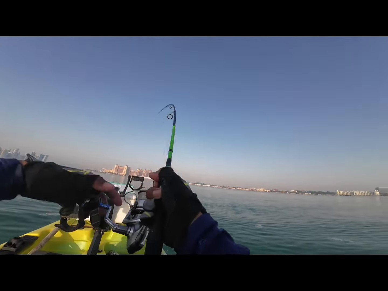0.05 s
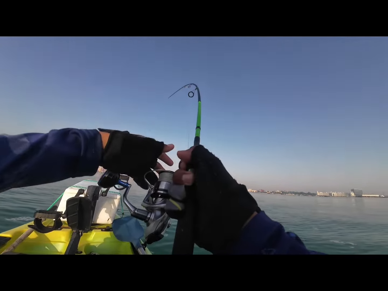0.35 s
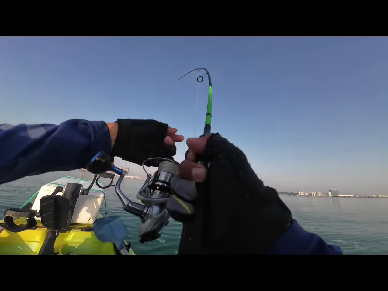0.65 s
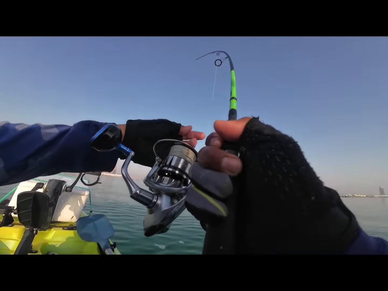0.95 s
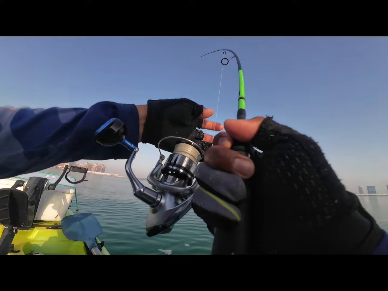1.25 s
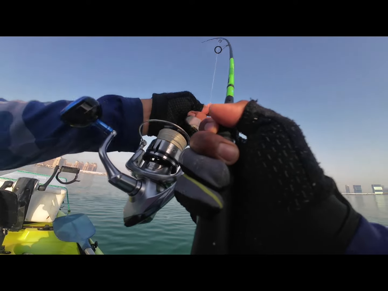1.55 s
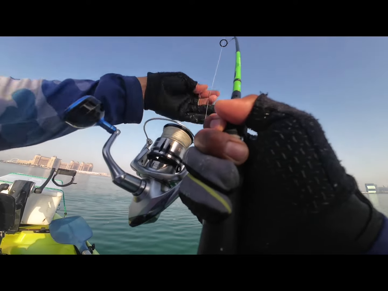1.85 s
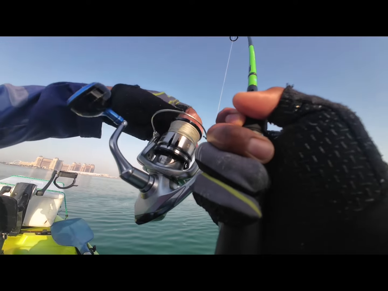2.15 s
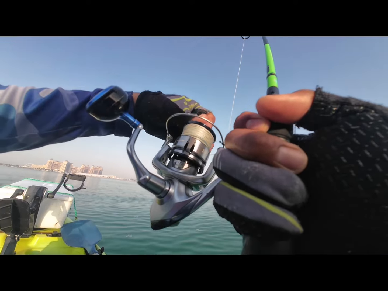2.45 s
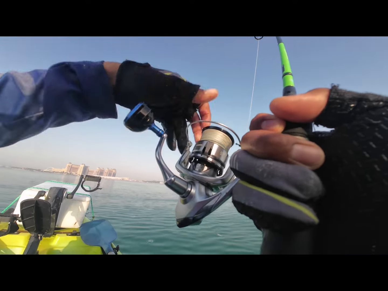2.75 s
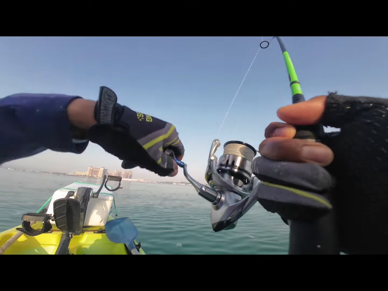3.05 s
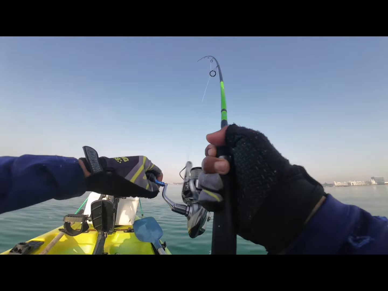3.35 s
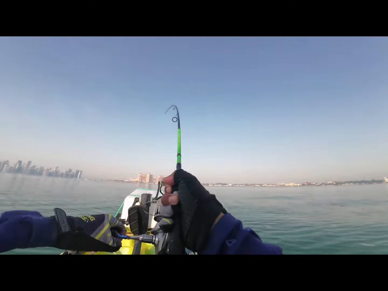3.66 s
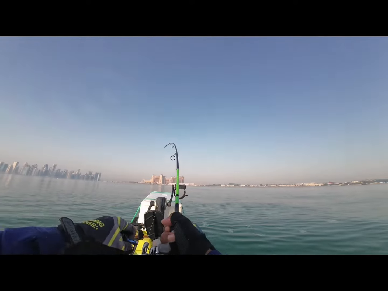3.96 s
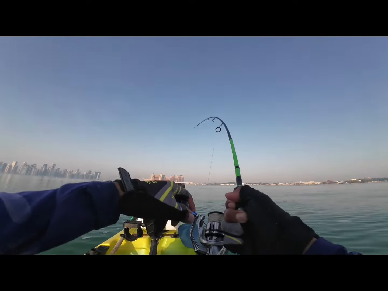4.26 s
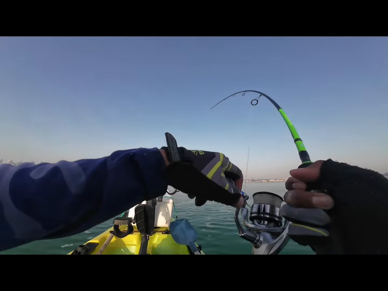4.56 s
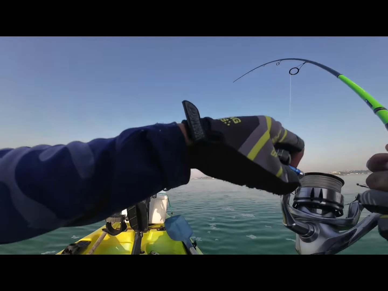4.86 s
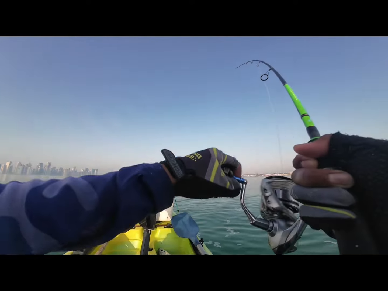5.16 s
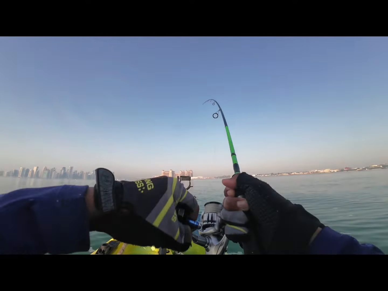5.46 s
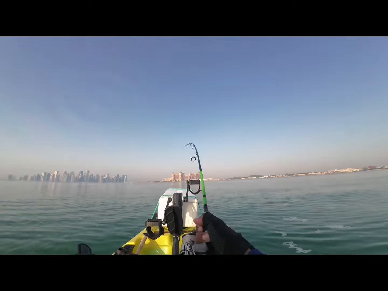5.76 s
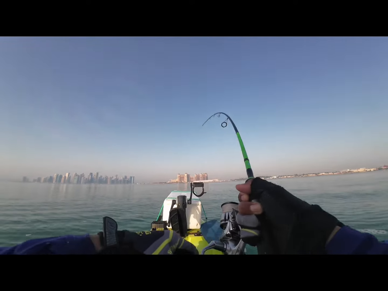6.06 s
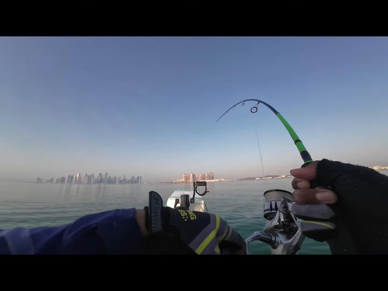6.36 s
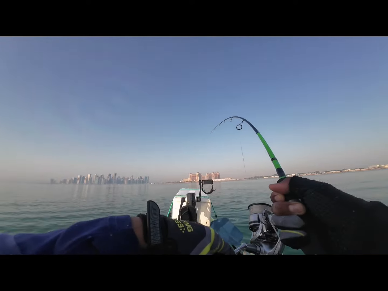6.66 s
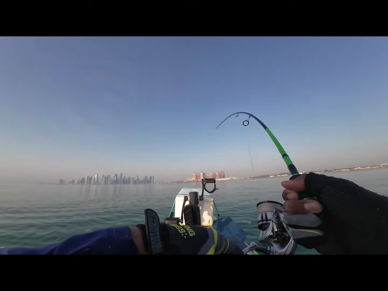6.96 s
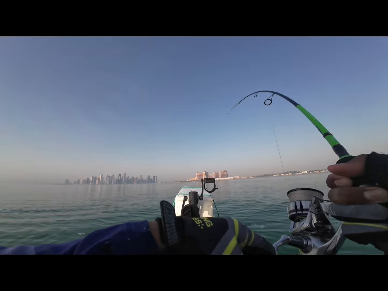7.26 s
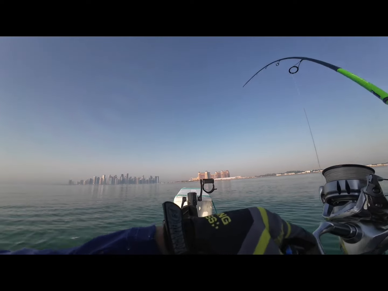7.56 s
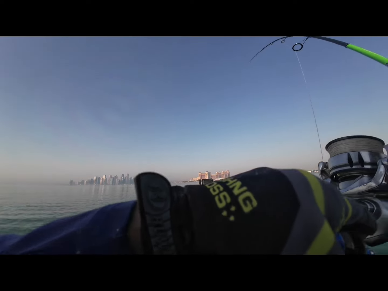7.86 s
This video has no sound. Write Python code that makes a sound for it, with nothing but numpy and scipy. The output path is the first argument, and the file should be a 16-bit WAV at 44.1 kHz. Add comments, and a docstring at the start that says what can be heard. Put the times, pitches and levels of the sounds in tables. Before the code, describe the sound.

A faint, low murmur of breeze and calm water runs throughout, with a thin hiss on top. At about 1.8 seconds a spinning reel's drag gives a short, bright metallic rasp as a fish takes line, followed by a couple of light knocks. Around 2.6 seconds the drag knob makes six quick, crisp clicks, and a sharp clack lands near 3 seconds. From 3.2 to 4.1 seconds the handle is wound: gears whirr with a wavering whine, line swishes softly, and loose parts knock, loudest around 4 seconds. After a lull, a second, shorter spell of winding runs from 5.3 to 5.9 seconds. A few soft, dull bumps from hands on the rod and wavelets on the kayak hull come with the handling. At about 6.8 seconds the drag rasps again, briefer and quieter. Everything sounds close and dry.

```python
"""A spinning reel's drag ratchet rasps twice as a fish takes line, each tooth snapping a pawl on the spool.
Between the runs the angler clicks the drag knob tighter, grabs the handle and winds in two spells:
gears whirr and whine, line swishes once a rotor turn, loose parts knock on the reel body.
All is close and dry, on a kayak in calm water: hands bump the rod, wavelets tap the hull,
and a low bed of breeze and water murmurs beneath."""
import sys
import numpy as np
from scipy import signal
from scipy.fft import rfft, irfft
from scipy.io import wavfile
from scipy.ndimage import uniform_filter1d

SR = 44100
rng = np.random.default_rng(int(sys.argv[2]) if len(sys.argv) > 2 else 0)


def inscribe(sig):
    """Save sig as 16-bit PCM at rate SR to the path in sys.argv[1].

    A 1-D sig is mono; a 2-D sig holds one channel per row.
    Samples are clipped to [-1, 1] before scaling.
    """
    pcm = np.round(np.clip(np.atleast_2d(sig).T, -1, 1) * 32767)
    wavfile.write(sys.argv[1], SR, pcm.astype(np.int16))


N = 348831
TIME = np.arange(N) / SR
HIT_TIME = TIME[:8192]  # time axis of a one-shot

# runs of the fish: t/s, teeth slipped, full-speed tooth gap/s, extra first gap/s, extra last gap/s,
# level/dB, late teeth's accent f/Hz, accent/dB, washer level/dB
FISH_RUNS = [(1.7528, 15, .00888, .0073, .0086, -22, 6730, -6, -42),
             (6.778, 8, .0072, 0.00012, .0043, -33.5, 5630, 4, -47.5)]
# ring of spool and pawl: f/Hz, width/Hz, level/dB
SPOOL_MODES = [(5036, 510, -1.5), (6770, 920, -1.5), (7750, 1100, -1.5), (9200, 620, -4), (10110, 340, 2.5),
               (11600, 500, -5.5), (13300, 570, 4), (13900, 640, -3), (15400, 900, -31)]
# ping of the clicker's steel spring: f/Hz, level/dB, t60/s
SPRING_MODES = [(5160, -41, 0.08), (7280, -28, 0.044), (8480, -34, 0.09), (11460, -23, 0.066),
                (12150, -16, .045), (12700, -9, 0.052), (13840, -4, 0.038)]
# rub of the spool on its washers: f/Hz, level/dB
WASHER_EQ = [(100, -39.5), (280, 0.5), (500, -4), (1150, -9.5), (1800, 5), (2200, -3), (2800, -6.5),
             (4000, -9), (8000, -11), (16000, -20.5)]
# clicks of the drag knob: t/s, level/dB
DETENT_CUES = [(2.6045, -24.5), (2.638, -24), (2.6704, -25), (2.698, -27), (2.7248, -26.5), (2.7532, -26)]
# snap of one detent: f/Hz, level/dB
DETENT_EQ = [(500, -30.5), (1800, -65), (2700, -38), (3600, -19.5), (5200, -24), (6100, -15), (7000, -24.5),
             (8300, -22), (9400, -5.5), (10600, -16), (11700, -3), (13500, 0), (14400, -12), (16500, -26)]
# effort on the handle, one envelope a spell of winding: t/s, level/dB
EFFORT_ENVELOPES = [
    [(3.15, -77.5), (3.225, -41.0), (3.29, -37.5), (3.4, -40.5), (3.52, -37.5), (3.73, -48.5), (3.83, -39),
     (3.95, -47), (4.06, -48.5), (4.115, -75)],
    [(5.245, -75), (5.295, -48.5), (5.335, -39.5), (5.39, -43.0), (5.46, -42.0), (5.57, -47.5),
     (5.83, -42.0), (5.89, -53), (5.945, -71.5)],
]
# ring of the reel body: f/Hz, width/Hz, level/dB
BODY_MODES = [(812, 202, -23.5), (1516, 430, -5.5), (1936, 260, 6.5), (2163, 210, 6), (2435, 270, 3),
              (3164, 940, -3), (3653, 356, -2), (4220, 760, -14), (4800, 390, -10.5), (5660, 410, -16.5),
              (6380, 250, -14)]
# broad whirr of the gears: f/Hz, level/dB
GEAR_EQ = [(100, -4), (330, 7), (700, 1.5), (1200, 8.5), (3000, 6.5), (7000, -16.5), (16000, -16)]
# ring of rotor and bail: f/Hz, width/Hz, level/dB
BAIL_MODES = [(6270, 160, -7.5), (11900, 273, -10)]
# tones of the gear mesh: cycles per rotor turn, level/dB
WHINE_TONES = [(112, -5), (140, -9.5), (176, 0.5)]
# hiss of line on the roller: f/Hz, level/dB
LINE_EQ = [(4000, -14), (7200, -20), (7900, -4), (8600, -7), (10200, -2.5), (11500, -11.5), (13400, -13),
           (14500, -18.5), (16000, -28)]
# knocks of handle, bail and line guide: t/s, level/dB, accent f/Hz, accent/dB, contact decay/s
KNOCK_CUES = [(1.491, -57, 4750, -4, 0.0032), (1.975, -50.5, 3180, -11, 0.018),
              (2.014, -37.5, 2180, -7, 0.0066), (2.2227, -34, 3960, -1, 0.0017),
              (2.942, -50.5, 2290, -5.5, 0.0044), (2.9706, -25.5, 3570, 0, 0.00075),
              (3.351, -40, 4600, -6, 0.00092), (3.463, -36, 2780, -15, .0015),
              (3.507, -37.5, 7040, -11, .004), (3.976, -32, 1740, 10.5, 0.0079),
              (4.039, -27.5, 2480, 11.5, 0.0033), (4.154, -54, 3210, 2, 0.00094),
              (4.7817, -64, 1500, 1, .001), (4.821, -60, 1590, 1, 0.00089), (5.339, -38, 2960, -11, .003),
              (5.423, -35.5, 4600, 3.5, 0.0033)]
# attack of a knock: f/Hz, level/dB
CONTACT_EQ = [(150, -17.5), (700, -17), (2200, -2), (4000, 1.5), (6000, -8.5), (9000, -13), (13000, -18.5),
              (16000, -28.5)]
# hands on the rod and wavelets on the hull: t/s, level/dB, f/Hz, decay/s
BUMP_CUES = [(2.635, -44.5, 646, 0.0032), (3.362, -43, 1070, 0.0072), (3.463, -44.5, 447, 0.013),
             (5.428, -42, 785, 0.018), (5.925, -45.5, 370, 0.03)]
# fingertip on the spool rim: t/s, level/dB, f/Hz, width/Hz, decay/s
SLIDE_CUES = [(2.021, -60.5, 3050, 555, 0.14)]
# murmur of breeze and water: f/Hz, level/dB
MURMUR_EQ = [(12, -34.5), (20, -4.5), (59, -0.5), (185, -16.5), (209, -13.5), (242, -15.5), (270, -21.5),
             (290, -19), (367, -16.5), (401, -24), (489, -25), (690, -34.5), (1500, -44.5), (1950, -75.5),
             (3300, -120)]
# faint, bright hiss: f/Hz, level/dB
HISS_EQ = [(300, -12.5), (1200, -5.5), (2500, -2.5), (4000, -1.5), (6500, 1.5), (10000, 3), (13000, 3),
           (15600, 1), (16100, -29)]


def drag_ratchet(early_hz=(9900, 13900), fade_db=-2.5, scatter_db=.6, rub_gap_s=.008, rub_edge_s=.024):
    """The spool slips on rubbing washers; each tooth snaps the pawl, softer and lower as the pull fades."""
    out = np.zeros(N)
    rub = unit(colour(rng.standard_normal(N), WASHER_EQ))
    for start, teeth, gap, first, last, db, late_hz, late_db, rub_db in FISH_RUNS:
        gaps = tooth_gaps(teeth, gap, first, last)
        times = start + np.append(0, np.cumsum(gaps))
        for k, s in enumerate(times):
            progress = k / len(gaps)
            hz, accent_db = (late_hz, late_db) if progress > .5 else (early_hz[k % 2], -7)
            snap = chatter(decay=.00068, tail_db=-21, tail_decay=.0033)
            accent = undb(accent_db) * hit(resonate(snap, [(hz, 1100, 0)]))
            ring = hit(resonate(snap, SPOOL_MODES)) + accent
            gain = undb(db + fade_db * progress + scatter_db * rng.standard_normal())
            add(out, s, gain * (hit(ring) + undb(-13.5) * spring()))
        speed_times = [start - rub_edge_s, *(times[1:] - gaps / 2), times[-1] + rub_edge_s]
        speed = np.interp(TIME, speed_times, [0, *(rub_gap_s / gaps), 0])
        out += undb(rub_db) * speed ** 2 * rub
    return out


def tooth_gaps(teeth, gap, first, last, spin_up=.5, brake=.38):
    """Seconds from tooth to tooth: the spool spins up, runs freely and brakes."""
    k = np.arange(teeth - 1)
    return gap + first * spin_up ** k + last * brake ** k[::-1]


def spring(scatter_db=2.9):
    """The clicker spring pings, its modes balanced a little differently each time."""
    hz, db, t60 = np.transpose(SPRING_MODES)[:, :, None]
    gain = undb(db + scatter_db * rng.standard_normal(db.shape))
    fade = np.exp(-np.log(1000) * HIT_TIME / t60)
    return hit(np.sum(gain * np.sin(2 * np.pi * hz * HIT_TIME) * fade, axis=0))


def drag_knob():
    """Each detent is one crisp snap that leaves the spring ringing."""
    out = np.zeros(N)
    for s, db in DETENT_CUES:
        snap = colour(chatter(decay=.00021, tail_db=-29, tail_decay=.0063), DETENT_EQ)
        add(out, s, undb(db) * (hit(snap) + undb(-4) * spring()))
    return out


def winding(turns_per_s=18, at_effort_db=-42.5, doubling_db=34, waver=.055, full_swish_db=-45):
    """Effort on the handle drives the rotor's speed and rides the level of gears and line."""
    effort = sum(envelope(*np.transpose(spell)) for spell in EFFORT_ENVELOPES)
    speed = turns_per_s * 2 ** ((20 * np.log10(effort) - at_effort_db) / doubling_db)
    turns = np.cumsum(speed * (1 + waver * wander(18))) / SR
    swish_gain = np.minimum(effort / undb(full_swish_db), 1)
    return undb(-.5) * effort * gears(turns) + swish_gain * line_swish(turns)


def gears(turns, teeth=14, grain_db=3, scrape_db=1.6, flutter_db=1.67):
    """Gear teeth rub and tick, ringing the body and the bail under a gliding whine."""
    ticks = np.diff(np.floor(turns * teeth), prepend=0) * undb(grain_db * rng.standard_normal(N))
    friction = rng.standard_normal(N) * undb(scrape_db * wander(350))
    mesh = (unit(friction) + undb(-7) * unit(ticks)) * undb(flutter_db * wander(45))
    body = unit(resonate(mesh, BODY_MODES))
    whirr = unit(colour(mesh, GEAR_EQ))
    bail = unit(resonate(mesh, BAIL_MODES))
    return unit(body + undb(-13.5) * whirr + undb(-3) * gear_whine(turns) + undb(-18.5) * bail)


def gear_whine(turns, roughness_hz=200):
    """The mesh sings narrow, gritty tones that glide with the rotor's speed."""
    out = 0
    for cycles, db in WHINE_TONES:
        phase = 2 * np.pi * cycles * turns
        out += undb(db) * (wander(roughness_hz) * np.sin(phase) + wander(roughness_hz) * np.cos(phase))
    return unit(out)


def line_swish(turns, swing_db=3.5, grain_db=1.5, slack_db=-58, taut_db=-50, catch_s=3.781):
    """Line swishes over the roller once a turn; it catches with a zip and runs louder once taut."""
    hiss = colour(rng.standard_normal(N), LINE_EQ)
    pulse = undb(swing_db * np.sin(2 * np.pi * turns) + grain_db * wander(500))
    zip_db = 17 * np.exp(-np.abs(TIME - catch_s) / .011)
    return unit(hiss * pulse) * undb(np.where(TIME < catch_s, slack_db, taut_db + zip_db))


def knocks(rise_share=.5, pivot_hz=3207, tilt_db=6.5):
    """Loose parts strike the reel body and thump the rod; higher accents come with a brighter clack."""
    out = np.zeros(N)
    for s, db, hz, accent_db, decay in KNOCK_CUES:
        attack = 1 - np.exp(-HIT_TIME / (rise_share * decay))
        contact = chatter(decay, tail_db=-25.5, tail_decay=.007) * attack
        clack = colour(contact, CONTACT_EQ, tilt_db * np.log2(hz / pivot_hz))
        accent = undb(accent_db) * hit(resonate(clack, [(hz, 500, 0)]))
        ring = hit(resonate(clack, BODY_MODES)) + accent
        rod_thump = hit(resonate(contact, [(805, 900, 0)]))
        add(out, s, undb(db) * hit(ring + undb(6) * hit(clack) + undb(-8.5) * rod_thump))
    return out


def bumps():
    """Hands on the rod and wavelets on the hull: each soft contact rings one dull, damped resonance."""
    out = np.zeros(N)
    for s, db, hz, decay in BUMP_CUES:
        contact = chatter(decay, tail_db=-11, tail_decay=.03)
        width_hz = 90 + 2.37 / decay
        add(out, s, undb(db) * hit(resonate(contact, [(hz, width_hz, 0)])))
    return out


def finger_slide():
    """A fingertip lands on the spool rim and rubs more and more lightly."""
    out = np.zeros(N)
    for s, db, hz, width, decay in SLIDE_CUES:
        rub = unit(resonate(rng.standard_normal(N), [(hz, width, 0)]))
        add(out, s, undb(db) * rub * np.exp(-TIME / decay))
    return out


def breeze_and_water(waver_db=2.08):
    """The bed: a low, wavering murmur with a faint, steady hiss on top."""
    murmur = unit(colour(rng.standard_normal(N), MURMUR_EQ)) * undb(waver_db * wander(6))
    hiss = unit(colour(rng.standard_normal(N), HISS_EQ))
    return undb(-57.5) * murmur + undb(-70) * hiss


def chatter(decay, tail_db, tail_decay):
    """A contact as a noise burst: tiny impacts that die fast, then a faint rattle; decays in seconds."""
    fade = np.exp(-HIT_TIME / decay) + undb(tail_db) * np.exp(-HIT_TIME / tail_decay)
    return rng.standard_normal(len(HIT_TIME)) * fade


def resonate(x, modes):
    """Ring x through parallel, steep resonances: f/Hz, width/Hz, level/dB."""
    out = 0
    for hz, width, db in modes:
        b, a = signal.iirpeak(hz, hz / width, fs=SR)
        out += undb(db) * signal.lfilter(b, a, signal.lfilter(b, a, x))
    return out


def colour(x, points, tilt_db=0):
    """Minimum-phase EQ through points (f/Hz, level/dB), tilted by tilt_db an octave."""
    hz, db = np.transpose(points)
    octave = np.log2(np.maximum(np.fft.rfftfreq(len(HIT_TIME), 1 / SR), 1))
    curve_db = np.interp(octave, np.log2(hz), db + tilt_db * np.log2(hz / hz[0]))
    cepstrum = irfft(np.log(undb(curve_db)))
    cepstrum[1:] *= 2 * (np.arange(1, len(cepstrum)) < len(cepstrum) / 2)  # no ring before the attack
    return signal.fftconvolve(x, irfft(np.exp(rfft(cepstrum))))[:len(x)]


def envelope(s, db):
    """Gain along a level curve, silent outside it."""
    return undb(np.interp(TIME, s, db, left=-200, right=-200))


def wander(rate_hz):
    """Smooth random modulation with a spread near 1."""
    step = int(SR / rate_hz)
    return 1.2 * uniform_filter1d(np.repeat(rng.standard_normal(N // step + 1), step), step)[:N]


def undb(db):
    """Decibels to gain."""
    return 10 ** (np.asarray(db) / 20)


def unit(x):
    """Scale to rms 1."""
    return x / np.sqrt(np.mean(x ** 2))


def hit(x):
    """Scale a one-shot to the energy of 5 ms at rms 1."""
    return x * np.sqrt(.005 * SR / np.sum(x ** 2))


def add(out, s, x):
    """Mix x into out from s seconds on."""
    i = int(s * SR)
    out[i:i + len(x)] += x[:N - i]


def scene():
    """A mono mix, close and dry over open water."""
    mix = drag_ratchet() + drag_knob() + knocks() + bumps() + finger_slide() + winding()
    return (mix + breeze_and_water())[None]


def record(dry):
    """A steep high cut at 16.5 kHz."""
    return signal.sosfilt(signal.ellip(8, .2, 70, 16500, fs=SR, output="sos"), dry)


dry = scene()
out = record(dry)
inscribe(out)
```